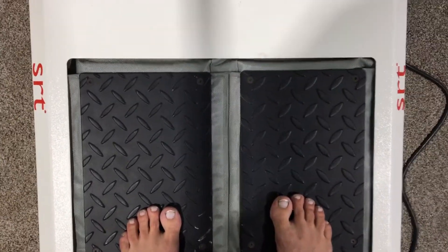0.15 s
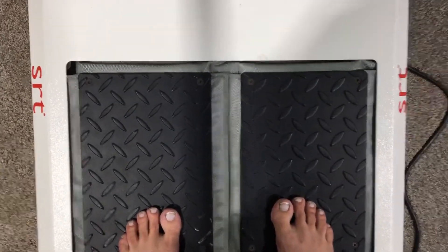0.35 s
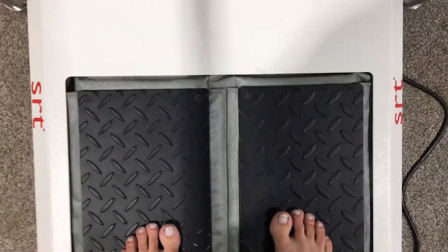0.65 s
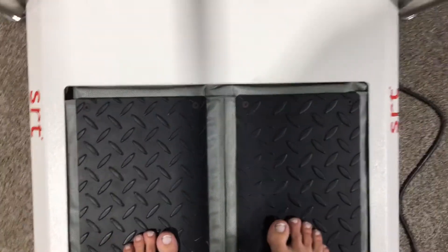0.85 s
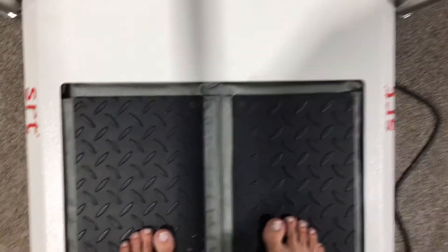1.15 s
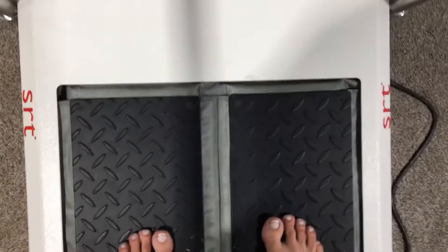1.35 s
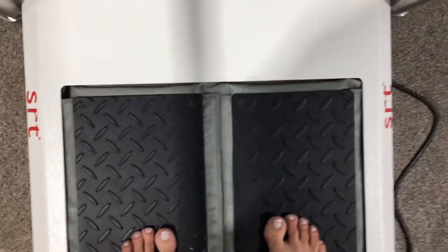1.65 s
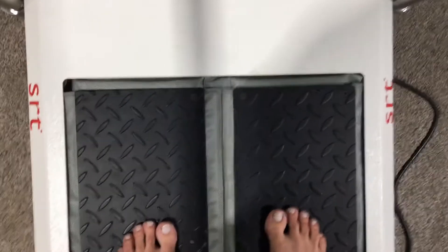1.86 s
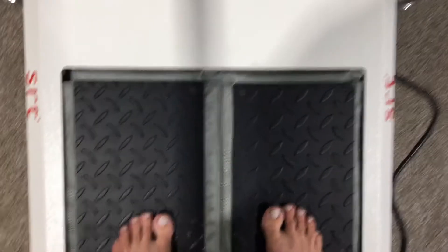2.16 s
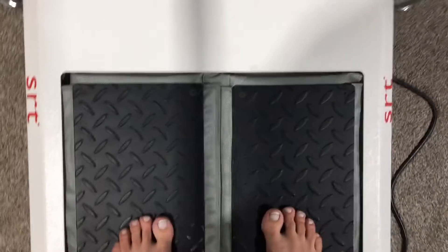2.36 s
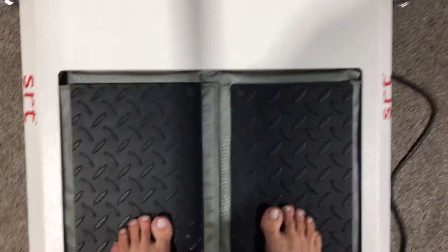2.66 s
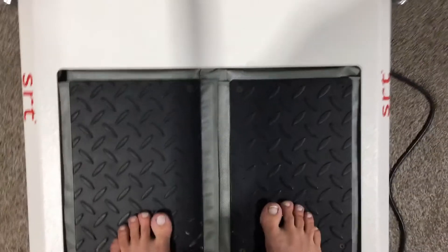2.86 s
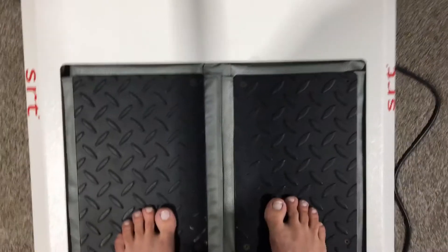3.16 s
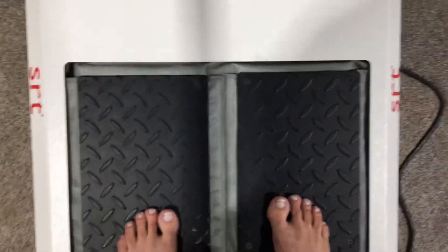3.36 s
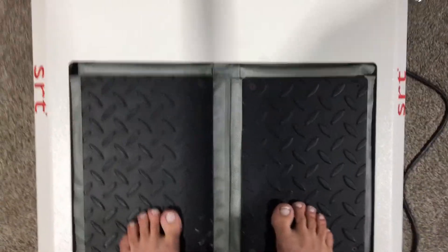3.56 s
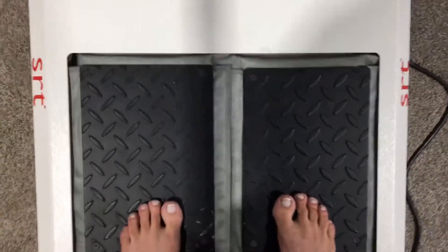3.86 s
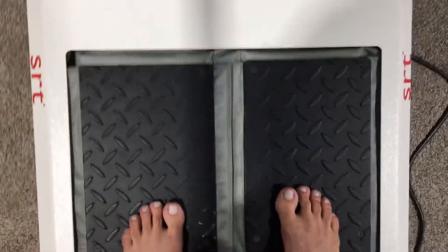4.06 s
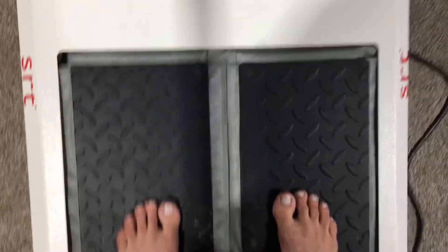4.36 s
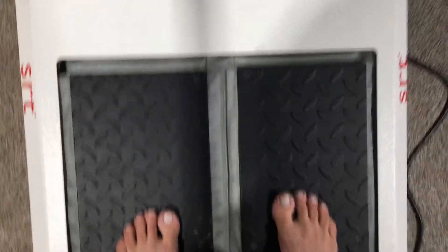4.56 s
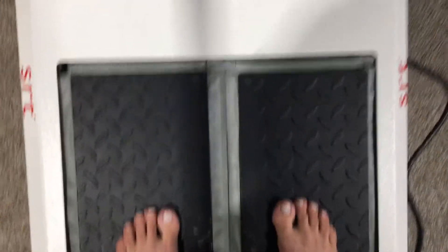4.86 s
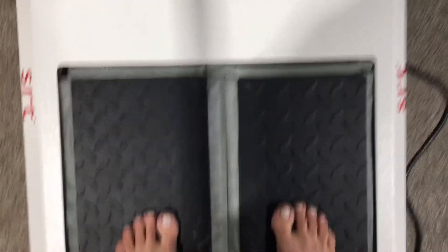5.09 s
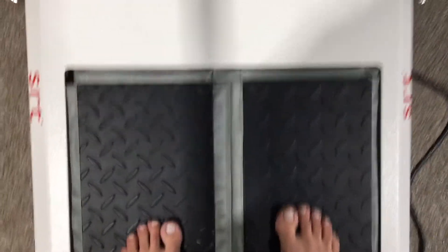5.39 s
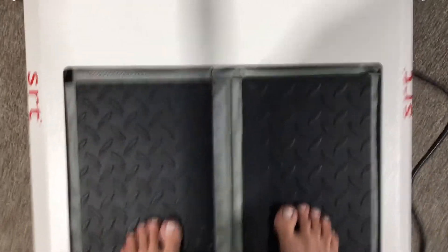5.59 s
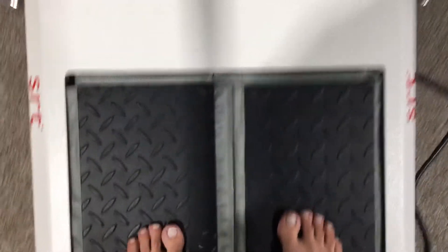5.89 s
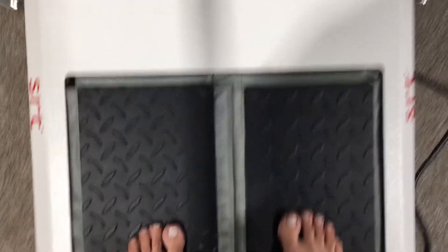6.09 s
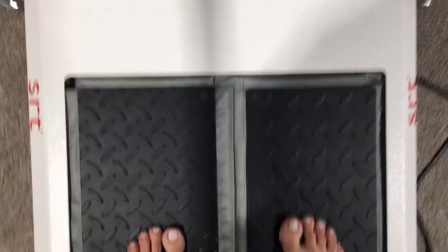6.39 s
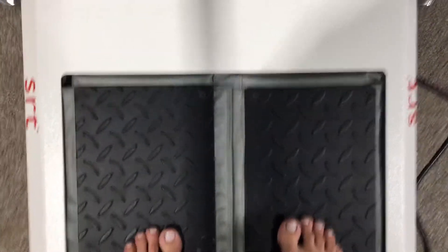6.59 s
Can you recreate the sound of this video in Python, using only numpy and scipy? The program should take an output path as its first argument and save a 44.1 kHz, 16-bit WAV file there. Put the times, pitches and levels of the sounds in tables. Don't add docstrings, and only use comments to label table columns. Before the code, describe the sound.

A vibrating foot platform gains speed on a carpeted floor, heard closely from a handheld phone above. From 0 to 1.5 seconds it is quiet: low motor thumps, roughly eleven a second, with dull loose knocks, a few ticks and short scratchy swishes over soft room hiss. From 1.5 to 3.7 seconds the rumble builds, surging near 2.1 and easing around 2.7; the swishes grow more frequent and sharp creaks stand out. From about 3.7 seconds the knocks give way to rapid linkage clacks, around twenty a second, strongest between 4.8 and 6. After 4.4 the plate edges brush in regular gritty hisses. The thumps, now about thirty a second, blur into a throbbing, buzzing hum whose tones rise and swell. Grit crackles and a very high electrical whistle stays faint. The shaking is strongest at the end, 6.7 seconds, without stopping.

```python
import sys
import numpy as np
from scipy import signal
from scipy.fft import rfft, irfft, next_fast_len
from scipy.io import wavfile
from scipy.ndimage import uniform_filter1d, map_coordinates

SR = 44100
rng = np.random.default_rng(int(sys.argv[2]) if len(sys.argv) > 2 else 0)


def attenuation_scalar(level_db):
    decades = np.asarray(level_db, float) / 20
    return 10 ** decades


def unload_wav(signal):
    wavfile.write(
        sys.argv[1],
        SR,
        np.round(np.clip(np.atleast_2d(signal).T, -1, 1) * 32767).astype(np.int16),
    )


N = 296966
CAM_TURNS = 0.285

# (time [s], drive frequency [Hz])
DRIVE_RAMP = [(0, 43.1), (6.74, 121.96)]
# (time [s], level [dB])
SHAKING = [
    (0, -34),
    (.2, -37.5),
    (.35, -29),
    (1.4, -24.5),
    (2.1, -20),
    (2.7, -24),
    (3.7, -21.5),
    (4.2, -20),
    (5.5, -22.5),
    (6.74, -19.5),
]
# (frequency [Hz], width [Hz], level [dB])
COVER_MODES = [(553, 116, 2.5), (702, 233, -2.5), (1140, 446, -10), (1870, 3340, -19.5)]
# (frequency [Hz], width [Hz], level [dB])
LINKAGE_MODES = [(710, 215, -3.5), (1290, 370, -4.5), (2300, 1400, -15)]
# (frequency [Hz], level [dB per Hz])
SEAL_COLOUR = [(1800, -16), (3000, -7.5), (3800, 6), (4570, 1), (5000, -3), (6150, 0.5), (7670, -3.5),
               (9120, -2.5), (10300, -8.5), (11100, -6), (15860, -15)]


def motor():
    # (time [s], speed [turns per second])
    shaft = [(0, 5.368), (3.37, 10.496), (6.74, 15.695)]
    # (time [s], lag [turns])
    seat_lag = [(0, 0.41), (2.2, 0.51), (3.7, 0.53), (4.7, 0.62), (5.6, .59), (6.74, 0.51)]
    speed = curves(shaft)[0]
    turns = np.cumsum(speed) / SR
    strong = blows(turns - CAM_TURNS, scatter_db=2, jitter_s=0.0004)
    weak = blows(turns - CAM_TURNS - 0.5, scatter_db=2.5, jitter_s=0.0006)
    seat = plate_turns(seat_lag)
    strokes = blows(seat + 0.1003, scatter_db=1.52, jitter_s=0.0016)
    strokes = strokes - 0.95 * blows(seat - 0.14, scatter_db=2.4, jitter_s=0.0015)
    settle = np.clip(speed / 9, 0.6, 1) ** 2

    body = frame_boom(strokes) / settle
    body = body + deck_thump(strong + 0.58 * weak, strokes, speed, settle)
    body = body + cover_rattle(strong + weak, speed)
    return body + gear_tone(turns, speed) + hum(turns, speed)


def frame_boom(strokes):
    # (frequency [Hz], width [Hz], level [dB])
    frame_modes = [(55, 7, -5.5), (83.1, 11, -1.5), (101, 15.7, 0.5), (132.9, 17.3, 0.5)]
    bearing = attenuation_scalar(wobble(37)) * rng.standard_normal(N)
    boom = 0.14 * ringing_layer(strokes, frame_modes, 220) + 0.25 * ringing_layer(bearing, frame_modes, 200)
    return attenuation_scalar(curves(SHAKING)[0]) * boom


def deck_thump(pushes, strokes, speed, settle):
    # (frequency [Hz], width [Hz], level [dB])
    deck_modes = [(200.7, 38.1, 3), (257.1, 46, 3), (292.3, 42.5, -3.5)]
    # (frequency [Hz], width [Hz], level [dB])
    plate_modes = [(288, 52, -0.5), (337, 62, -3.5), (380.7, 36.6, -6)]
    push = filtered(pushes, lambda f: np.abs(resonance(deck_modes, f)) / (1 + (f / 330) ** 4))
    thump = settle * (steady(push, 0.38) + 0.4 * ringing_layer(strokes, deck_modes, 263))
    bearing = attenuation_scalar(1.3 * wobble(25)) * rng.standard_normal(N)
    thump = thump + 0.87 * ringing_layer(bearing, deck_modes, 340)

    shudder_s, shudder_rest = 0.008, 0.75
    shudder = filtered(np.abs(strokes), lambda f: np.exp(-0.5 * (2 * np.pi * f * shudder_s) ** 2))
    shudder = (shudder_rest + steady(shudder, 0.88)) * rng.standard_normal(N) + 40 * strokes
    slap = attenuation_scalar(-13 + 0.4561 * speed) * ringing_layer(shudder, plate_modes, 470)

    settled_db = -31
    thump_db = -42 + 1.0 * speed + np.minimum(curves(SHAKING)[0] - settled_db, 0)
    return attenuation_scalar(thump_db) * (steady(thump, 0.73) + slap)


def cover_rattle(pushes, speed):
    bearing = attenuation_scalar(2.4 * np.clip(wobble(40), -2, 1.3)) * rng.standard_normal(N)
    rattle = 0.2 * ringing_layer(pushes, COVER_MODES, 4400) + ringing_layer(bearing, COVER_MODES, 2750)
    return attenuation_scalar(-63.5 + 1.2184 * speed) * steady(rattle, 1.0)


def gear_tone(turns, speed):
    teeth = 59.4
    level_db = peaks_at(teeth * speed, idle_db=-78, gain_db=26.5, at=575, width=68)
    level_db = level_db + 3 * wobble(12) + 3 * np.cos(2 * np.pi * turns)
    return attenuation_scalar(level_db) * np.sin(2 * np.pi * teeth * turns + 0.9 * wobble(30))


def hum(turns, speed):
    swells = {3: [(15.1, 0.91, -36)], 4: [(10.7, .9, -46), (12.2, .8, -40), (14.4, 1, -30)],
              5: [(10.5, 0.78, -31.5), (11.7, 0.52, -37), (12.8, 0.58, -32.5), (15.4, 0.78, -25)],
              6: [(8.6, 1, -28), (10.4, 0.5, -39.5), (12.2, 1, -32.5), (13.9, 0.31, -30.5),
              (15.1, 0.63, -26.5)], 7: [(8.0, 0.9, -38), (10.4, 0.74, -33.5), (12.5, 1.24, -29),
              (14.4, 0.36, -39)], 8: [(7.0, 0.94, -34), (8.6, 0.3, -46), (12.0, 0.95, -38),
              (13.2, 0.47, -34.5), (13.9, 0.48, -33)], 9: [(8.9, 0.77, -28), (10.6, 0.22, -34),
              (11.9, 0.73, -30.5), (13.7, 0.35, -36.5), (15.3, 0.43, -25.5)], 10: [(7.9, 0.37, -30.5),
              (10.7, 0.47, -37), (13.4, 0.72, -33.5), (14.8, .4, -35.5)], 11: [(10.0, 0.74, -36),
              (11.5, 0.49, -42)], 12: [(6.9, 0.62, -37.5), (9.5, 0.74, -39.5), (11.65, 0.28, -30),
              (15.2, 0.84, -41.5)], 14: [(10.0, 0.59, -36), (12.6, 0.69, -39), (14.5, 0.28, -38.5),
              (15.3, 0.16, -36.5)], 15.65: [(8.82, 0.38, -29)], 16: [(12.57, .4, -38)],
              18: [(13.1, 0.28, -42)], 20: [(6.9, 0.26, -39.5), (11.4, 0.33, -39)]}
    grid = np.linspace(speed.min(), speed.max(), num=400)
    total = np.zeros(N)
    for order, rows in swells.items():
        swell = sum(attenuation_scalar(db) * np.exp(-0.5 * ((grid - at) / width) ** 2) for at, width, db in rows)
        level = np.interp(speed, grid, swell) * attenuation_scalar(3 + 1.57 * wobble(2.888))
        lean = -2 * np.pi * CAM_TURNS * order if order > 11 else -np.pi * order * order / 5
        path = lean + 0.5 * wobble(0.8)
        total += level * np.cos(2 * np.pi * order * turns + path)
    return total


def near_plate():
    # (time [s], lag [turns])
    near_lag = [(0, 0.91), (2, 1.05), (3.2, 1.083), (4.5, 1.208), (6.74, 1.01)]
    brush_db = sets_in(stroke_rate(), idle_db=-60.5, gain_db=19, at=7, width=0.36)
    return plate(near_lag, brush_db, length=0.36)


def far_plate():
    # (time [s], lag [turns])
    far_lag = [(0, 0.74), (2.6, 0.82), (4.4, 0.46), (5.4, 0.62), (6.74, 0.75)]
    brush_db = peaks_at(stroke_rate(), idle_db=-70.5, gain_db=19, at=7.5, width=1.5)
    return plate(far_lag, brush_db, length=0.4)


def plate(lag, brush_db, length):
    sweep_rate = 7.97
    rate = stroke_rate()
    turns = plate_turns(lag)
    off = (turns + 0.5) % 1 - 0.5
    size, tone = rng.standard_normal((128, 2))[np.floor(turns + 2.5).astype(int)].T
    window = np.exp(-np.abs(off / (0.39 * length)) ** 4.2) * (rate > sweep_rate)
    coarse = np.clip(3.6 - 0.29 * rate, 0.6, 3)
    grit = attenuation_scalar(coarse * (0.45 * wobble(55) + 1.4 * wobble(100) + 0.7 * wobble(900)))
    lip_db = peaks_at(rate, idle_db=0.5, gain_db=7.5, at=5.2, width=0.6)
    lip = attenuation_scalar(-19 + 4.8 * coarse + 2.1 * tone + lip_db) * lip_hiss()
    sweep = window * grit * (hiss(SEAL_COLOUR) + lip)
    rub = 0.14 * attenuation_scalar(2.7 * wobble(30)) * hiss(SEAL_COLOUR)
    return attenuation_scalar(brush_db - 8.0 + 0.1 * size) * (sweep + rub)


def swishes():
    # (time [s], peak level [dB], length [ms])
    catches = [(0.033, -68, 29), (0.099, -65, 16), (0.125, -70, 16), (0.191, -68, 14), (0.24, -61, 42),
               (0.265, -58.5, 13), (0.329, -64, 17), (0.385, -74, 31), (0.447, -70, 11), (0.497, -58.5, 20),
               (0.605, -65, 15), (0.681, -69, 12), (0.73, -61, 28), (0.88, -70, 14), (0.958, -61, 14),
               (0.983, -63.5, 73), (1.142, -62.5, 11), (1.191, -61.5, 25), (1.21, -58, 11),
               (1.271, -68, 22), (1.35, -67, 17), (1.375, -61, 8.5), (1.403, -61.5, 55), (1.548, -65, 12),
               (1.595, -62.5, 61), (1.743, -63.5, 13), (1.8, -60.5, 40), (1.989, -60.5, 36),
               (2.156, -59, 43), (2.228, -66, 12), (2.338, -58, 27), (2.465, -55.5, 12), (2.489, -59.5, 54),
               (2.629, -60, 20), (2.662, -58.5, 31), (2.754, -59.5, 13), (2.785, -58, 13),
               (2.809, -58.5, 73), (2.918, -56, 15), (2.941, -58, 16), (2.976, -59, 43), (3.092, -56, 26),
               (3.218, -57.5, 39), (3.287, -59, 53), (3.381, -57, 49), (3.444, -57.5, 37), (3.504, -55, 38),
               (3.586, -56, 31), (3.657, -54, 25), (3.723, -56.5, 31), (3.787, -53, 27), (3.864, -54.5, 26),
               (3.925, -54, 30), (4.053, -53.5, 19), (4.134, -55, 58), (4.185, -53, 23), (4.268, -52, 47),
               (4.308, -53.5, 19), (4.389, -52.5, 54), (4.436, -51.5, 20)]
    # (time [s], peak level [dB], length [ms])
    more_catches = [(0.535, -67, 38), (0.76, -64, 40), (1.16, -64.5, 40), (2.31, -64, 20), (3.056, -61, 14),
                    (3.139, -59, 48), (3.35, -59, 22), (3.685, -60, 14.3), (3.82, -61, 14), (3.991, -56.5, 40),
                    (4.025, -55, 22)]
    events = catches + more_catches
    broad, sung = np.zeros(N), np.zeros(N)
    t = np.arange(-SR // 20, SR // 20) / SR
    for (s, db, ms), tone in zip(events, rng.standard_normal(len(events))):
        at = np.clip(round(s * SR) + np.arange(len(t)) - SR // 20, 0, N - 1)
        swell = attenuation_scalar(db) * np.exp(-np.abs(t / (0.0005 * ms)) ** 3.0)
        broad[at] = np.maximum(broad[at], swell)
        sung[at] = np.maximum(sung[at], attenuation_scalar(1.4 * tone) * swell)

    def grit():
        return attenuation_scalar(1.8 * wobble(60) + 2.3 * wobble(150) + 2.3 * wobble(900))

    brushed = attenuation_scalar(-6.0) * grit() * broad * hiss(SEAL_COLOUR)
    return brushed + attenuation_scalar(-9.5) * grit() * sung * lip_hiss()


def lip_hiss():
    return hiss([(2400, -41), (3200, -2.5), (3800, -3.5), (4400, 3.0), (5200, -10), (7500, -18.5), (11000, -39)])


def linkage():
    # (time [s], peak level [dB])
    clacks = [(3.727, -61), (3.772, -47), (3.811, -51), (3.861, -49), (3.906, -50), (3.955, -53),
              (4.019, -51), (4.06, -45.5), (4.101, -52), (4.142, -50), (4.191, -46), (4.283, -47),
              (4.336, -41.5), (4.41, -52), (4.45, -44.5), (4.532, -46), (4.578, -42), (4.616, -54),
              (4.655, -49), (4.701, -42.5), (4.761, -44.5), (4.82, -36.5), (4.883, -48), (4.936, -40.5),
              (5.003, -42), (5.053, -37), (5.118, -45.5), (5.177, -38.5), (5.246, -45.5), (5.288, -39.5),
              (5.349, -46), (5.403, -39), (5.457, -45), (5.514, -41), (5.568, -43), (5.621, -39),
              (5.654, -50), (5.688, -49), (5.734, -38), (5.8, -45), (5.84, -39), (5.895, -45.5),
              (5.945, -38.5), (6.002, -43), (6.05, -39), (6.106, -47), (6.146, -44), (6.209, -44),
              (6.257, -42), (6.312, -43), (6.369, -44), (6.429, -46), (6.46, -47), (6.53, -54),
              (6.568, -48), (6.64, -48), (6.685, -52), (6.718, -46)]
    rise_s, fall_s = 0.0046, 0.0067
    contact = np.bincount([round(s * SR) for s, db in clacks], [attenuation_scalar(db) for s, db in clacks], N)

    def swell(f):
        before = 1 - 2j * np.pi * f * rise_s
        after = 1 + 2j * np.pi * f * fall_s
        return SR * (rise_s + fall_s) / (before * after)

    chatter = filtered(contact, swell) * rng.standard_normal(N)
    return attenuation_scalar(20.5) * ringing(chatter + 2.9 * contact, LINKAGE_MODES, 2800)


def creaks():
    # (time [s], peak level [dB])
    ticks = [(0.121, -54), (0.603, -46.5), (1.3733, -51), (1.7848, -59), (1.9694, -57), (1.9874, -54),
             (2.1525, -58), (2.2286, -46.5), (2.46, -43.5), (2.7487, -42), (2.8035, -46), (2.9153, -40.5),
             (2.9395, -56), (3.0533, -39.5), (3.0916, -56), (3.2106, -39.5)]
    # (time [s], peak level [dB])
    knocks = [(0.059, -39.5), (0.096, -42), (0.123, -36.5), (0.231, -37), (0.353, -49), (0.462, -43),
              (0.492, -41), (0.622, -41), (0.724, -38.5), (0.964, -39), (1.051, -44), (1.181, -42),
              (1.372, -58), (1.399, -39), (1.594, -41), (1.793, -39), (2.161, -40.5), (2.21, -41),
              (2.586, -47), (2.725, -39), (2.879, -48), (3.218, -38.5), (3.299, -39), (3.365, -40),
              (3.511, -41), (3.585, -41), (3.653, -40)]
    sharp, dull = np.zeros(N + SR), np.zeros(N + SR)
    t = np.arange(SR // 25) / SR
    for s, db in ticks:
        burst = attenuation_scalar(-60 * t / 0.0096) * rng.standard_normal(len(t))
        sharp[round(s * SR):][:len(t)] += attenuation_scalar(db - 8.5) * burst
        dull[round(s * SR):][:len(t)] += attenuation_scalar(db - 13) * burst
    for s, db in knocks:
        swell = attenuation_scalar(db + 17 - 60 * t / 0.028) * (1 - np.exp(-t / 0.0012))
        dull[round(s * SR):][:len(t)] += swell * rng.standard_normal(len(t))

    def edge(f):
        return (1j * f / 3000) / (1 + 1j * f / 3000) / (1 + 1j * f / 9000)

    return filtered(sharp[:N], edge) + ringing(dull[:N], LINKAGE_MODES, 4300)


def crackle():
    struck = rng.random(N) < 1500 / SR
    grains = struck * rng.standard_normal(N) * attenuation_scalar(4 * rng.exponential(size=N))
    level_db = sets_in(stroke_rate(), idle_db=-63, gain_db=4.5, at=8, width=0.5)
    level_db = level_db + np.clip(2.3 * wobble(25) + 2.4 * wobble(90), -6, 4)
    return attenuation_scalar(level_db) * unit(ringing(np.clip(grains, -8, 8), COVER_MODES[2:], 2800))


def drive():
    drive_hz = curves(DRIVE_RAMP)[0]
    carrier = 2 * np.pi * 14995.5 * np.arange(N) / SR
    field = 2 * np.pi * np.cumsum(drive_hz) / SR

    def line(phase):
        return attenuation_scalar(2.5 * wobble(12)) * np.sin(phase + 0.6 * wobble(25))

    haze = 0.55 * hiss([(14820, -20), (14900, 0), (15100, 0), (15180, -20)])
    level_db = peaks_at(drive_hz, idle_db=-83.5, gain_db=7.5, at=79, width=19)
    return attenuation_scalar(level_db) * (line(carrier + field) + line(carrier - field) + haze)


def floor_sway():
    return attenuation_scalar(curves(SHAKING)[0] - 27) * hiss([(18, -6), (28, 0.5), (38, -3), (46, -20)])


def room():
    # (frequency [Hz], level [dB per Hz])
    room_colour = [(410, -34), (700, -0.5), (1050, -10), (1650, -2), (2700, -16.5), (4910, -20),
                   (9170, -22.5), (13000, -28.5), (14300, -50), (15860, -51)]
    return attenuation_scalar(-68.0 + 0.68 * wobble(46)) * hiss(room_colour)


def stroke_rate():
    return curves(DRIVE_RAMP)[0] / 12


def plate_turns(lag):
    return np.cumsum(stroke_rate()) / SR - curves(lag)[0]


def blows(turns, scatter_db, jitter_s):
    at = np.flatnonzero(np.diff(np.floor(turns)) > 0)
    chance = rng.standard_normal((len(at), 2))
    at = np.clip(at + np.round(chance[:, 0] * jitter_s * SR).astype(int), 0, N - 1)
    return np.bincount(at, attenuation_scalar(scatter_db * chance[:, 1]), N)


def resonance(modes, f):
    total = 0
    for k, (centre, width, db) in enumerate(modes):
        damping = 1j * f * width
        total = total + (-1) ** k * attenuation_scalar(db) * damping / (centre * centre - f * f + damping)
    return total


def ringing(x, modes, top_hz):
    return filtered(x, lambda f: resonance(modes, f) / (1 + 1j * f / top_hz) ** 2)


def ringing_layer(x, modes, top_hz):
    return steady(ringing(x, modes, top_hz), 0.67)


def sets_in(x, idle_db, gain_db, at, width):
    return idle_db + gain_db / (1 + np.exp((at - x) / width))


def peaks_at(x, idle_db, gain_db, at, width):
    return idle_db + gain_db * np.exp(-0.5 * ((x - at) / width) ** 2)


def hiss(spectrum):
    f, db = np.transpose(spectrum)

    def colour(hz):
        return attenuation_scalar(np.interp(np.log(hz + 1), np.log(f), db, -120, -120))

    return unit(filtered(rng.standard_normal(N), colour))


def filtered(x, response):
    m = next_fast_len(N + SR // 2)
    return irfft(rfft(x, m) * response(np.fft.rfftfreq(m, 1 / SR)), m)[:N]


def wobble(rate):
    knots = rng.standard_normal(int(N * rate / SR) + 4)
    return map_coordinates(knots, [np.arange(N) * rate / SR])


def steady(x, seconds):
    return x / np.sqrt(np.abs(uniform_filter1d(x ** 2, int(seconds * SR))) + 1e-20)


def unit(x):
    return x / np.sqrt(np.mean(x ** 2) + 1e-20)


def curves(rows):
    s, *cols = np.transpose(rows)
    return [np.interp(np.arange(N) / SR, s, c) for c in cols]


def scene():
    platform = motor() + near_plate() + far_plate() + swishes() + linkage()
    platform = platform + creaks() + crackle() + drive()
    return (platform + floor_sway() + room())[None]


def band_limit(x):
    return signal.sosfilt(signal.butter(12, 15770, fs=SR, output="sos"), x)


def record(dry):
    def microphone(f):
        return ((1j * f / 45) / (1 + 1j * f / 45)) ** 2 * (f < 15850)

    miked = filtered(dry[0], microphone)
    return band_limit(miked[None])


dry = scene()
out = record(dry)
unload_wav(out)
```